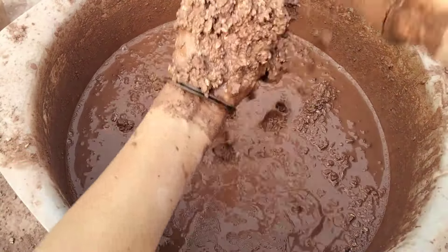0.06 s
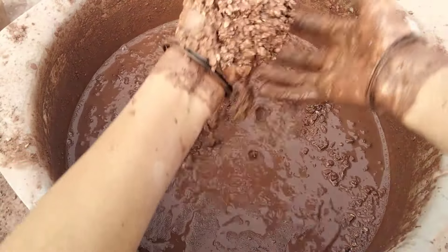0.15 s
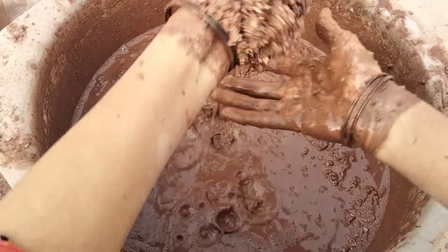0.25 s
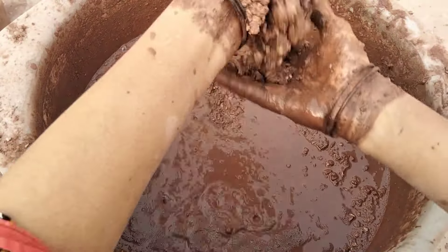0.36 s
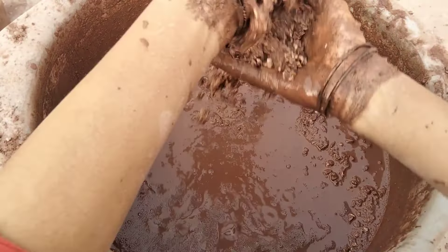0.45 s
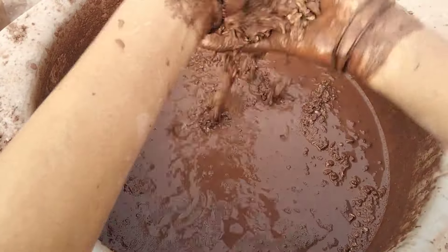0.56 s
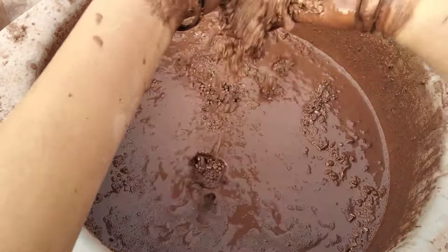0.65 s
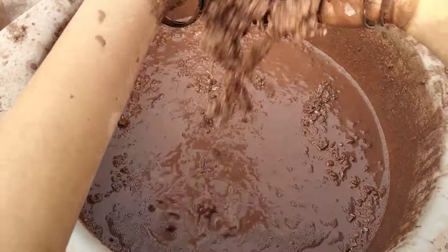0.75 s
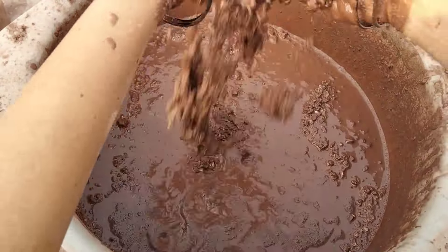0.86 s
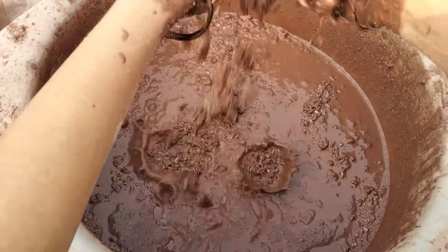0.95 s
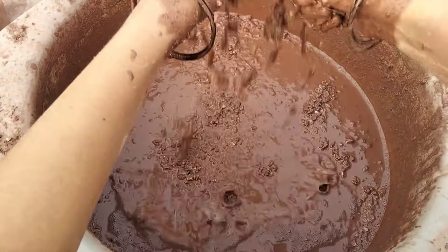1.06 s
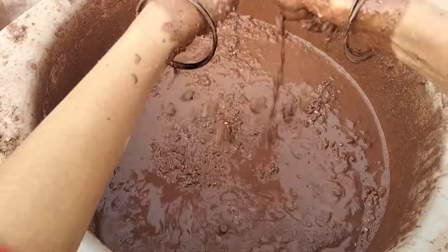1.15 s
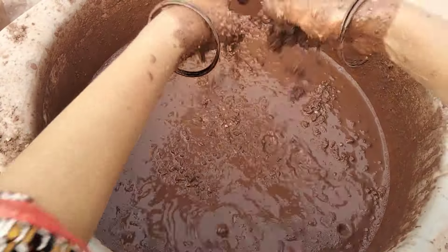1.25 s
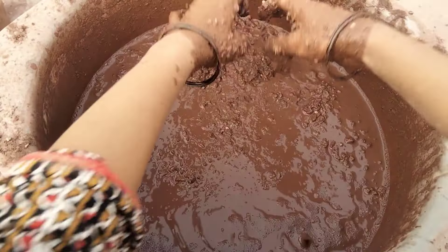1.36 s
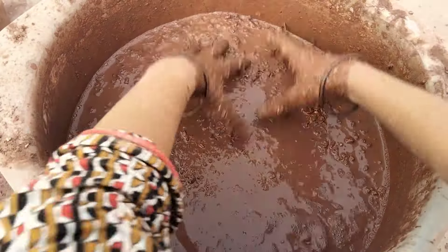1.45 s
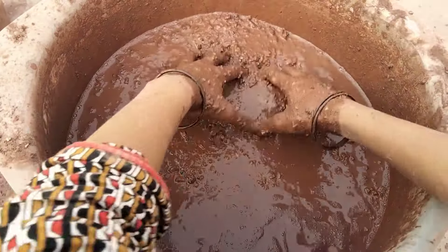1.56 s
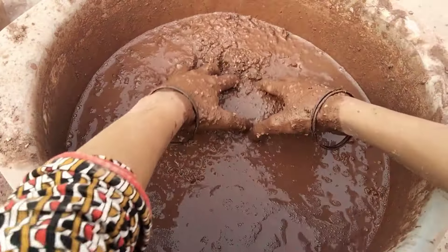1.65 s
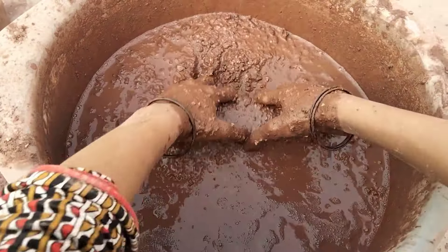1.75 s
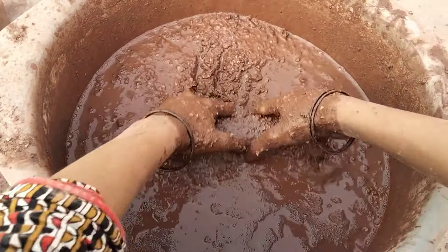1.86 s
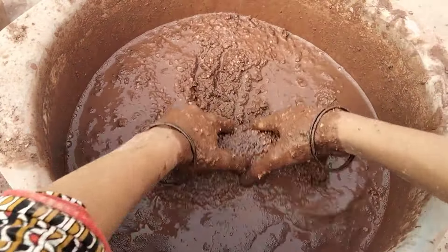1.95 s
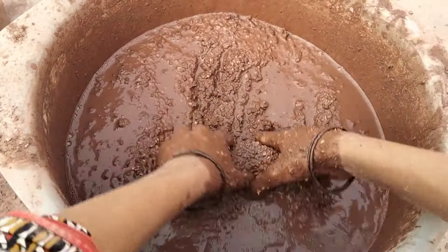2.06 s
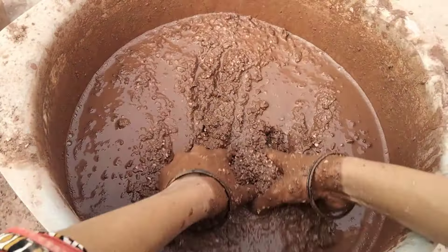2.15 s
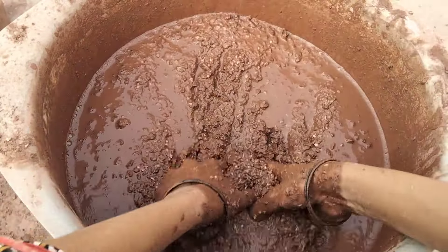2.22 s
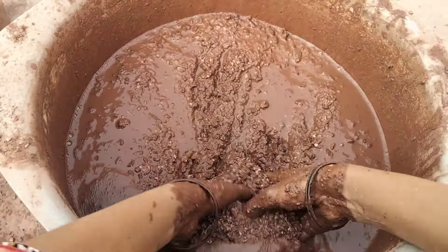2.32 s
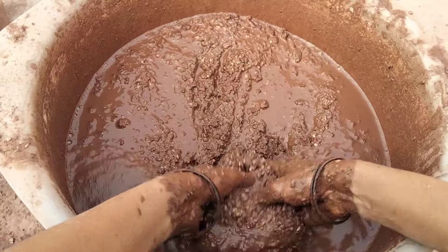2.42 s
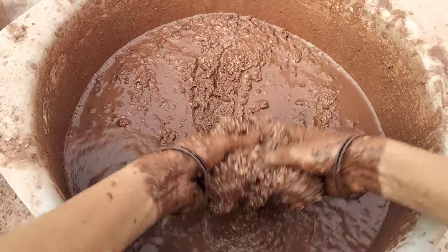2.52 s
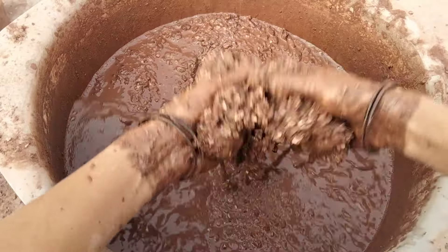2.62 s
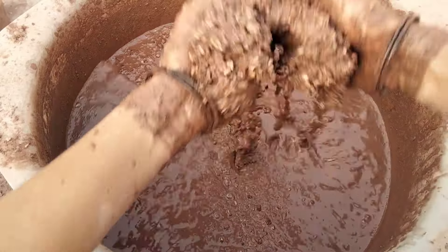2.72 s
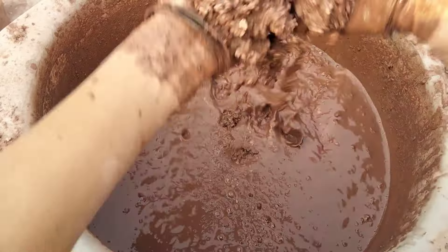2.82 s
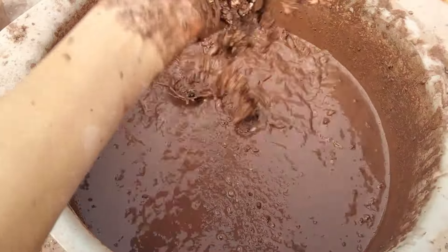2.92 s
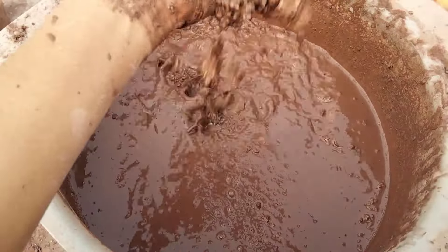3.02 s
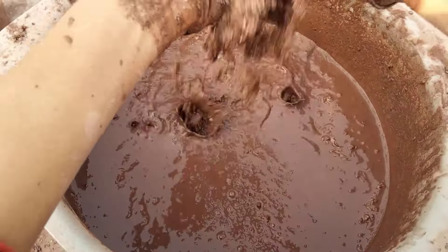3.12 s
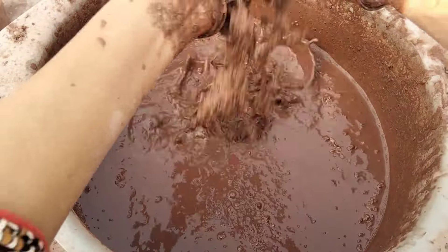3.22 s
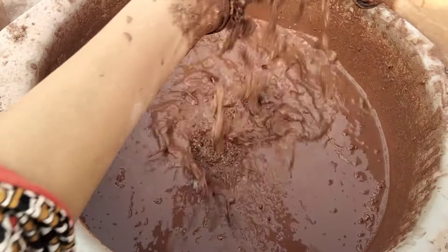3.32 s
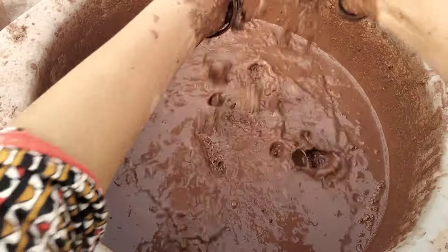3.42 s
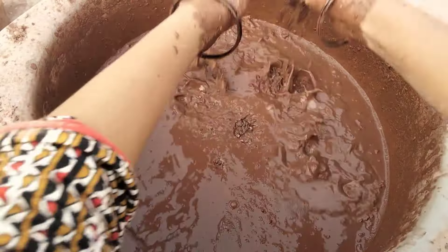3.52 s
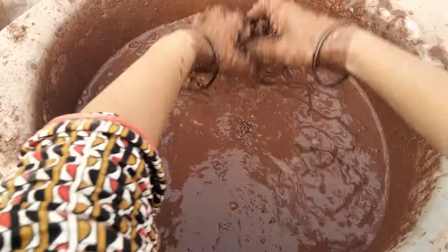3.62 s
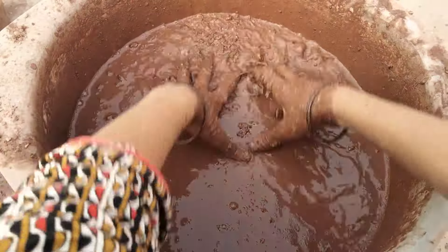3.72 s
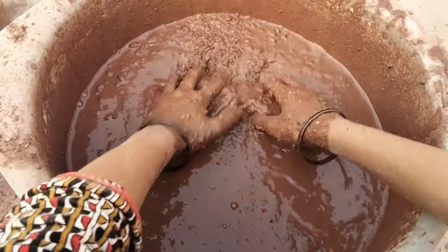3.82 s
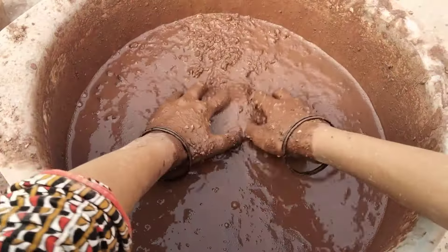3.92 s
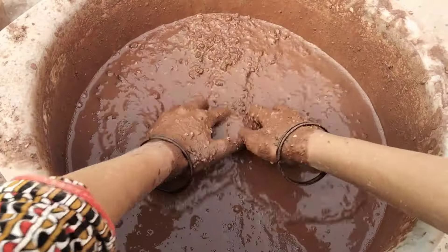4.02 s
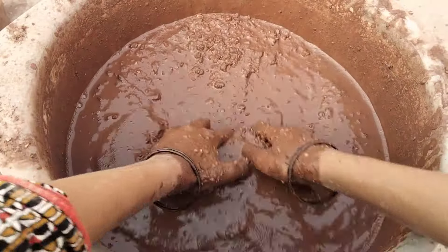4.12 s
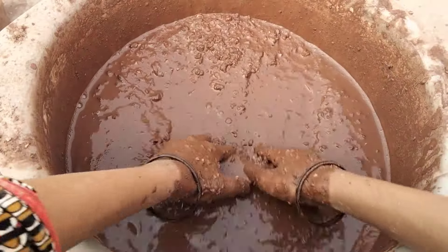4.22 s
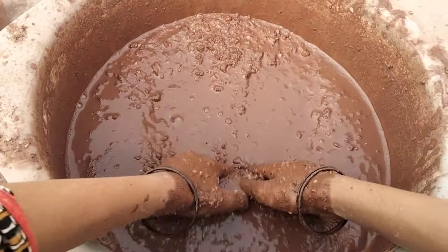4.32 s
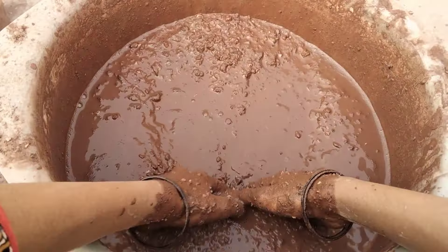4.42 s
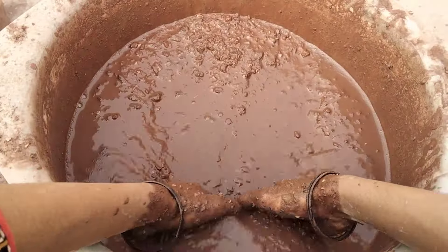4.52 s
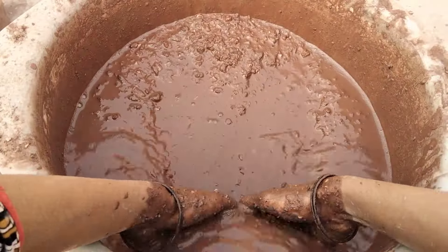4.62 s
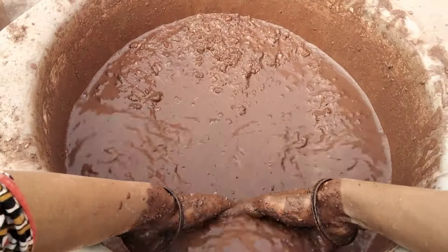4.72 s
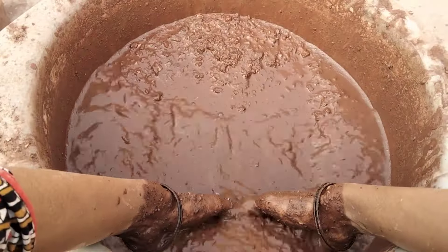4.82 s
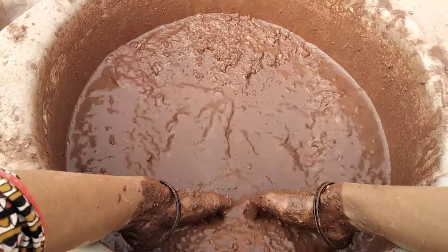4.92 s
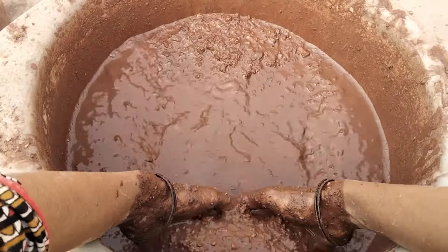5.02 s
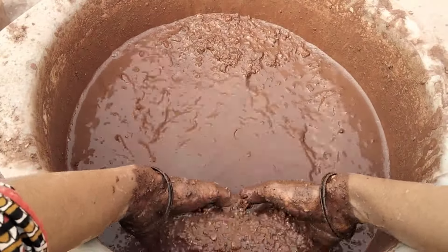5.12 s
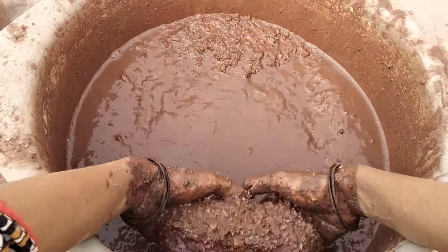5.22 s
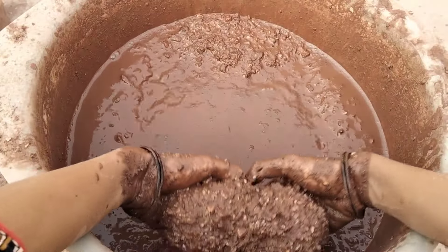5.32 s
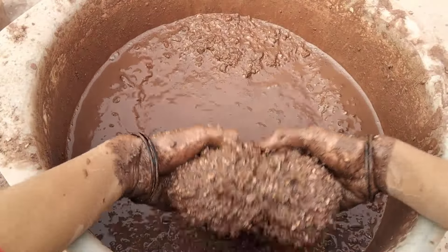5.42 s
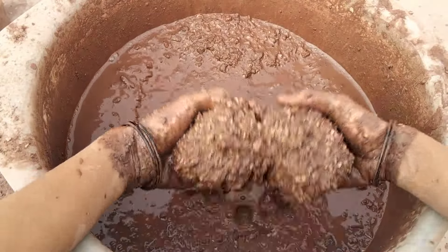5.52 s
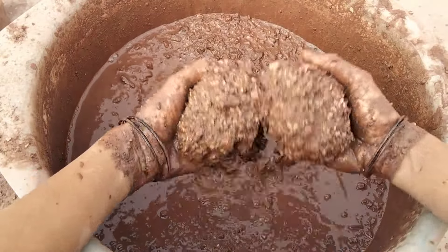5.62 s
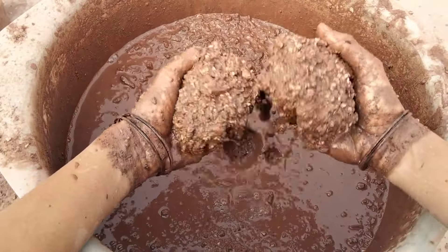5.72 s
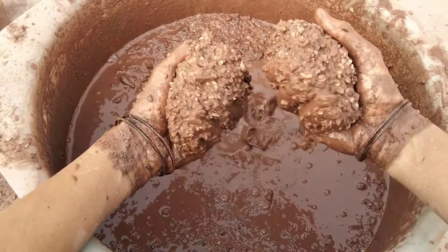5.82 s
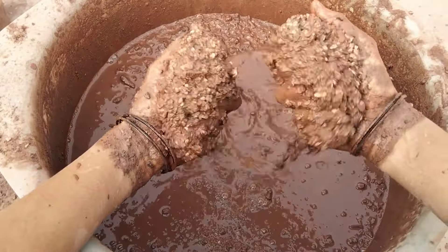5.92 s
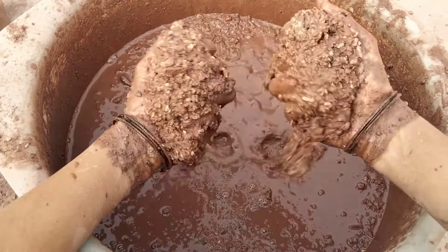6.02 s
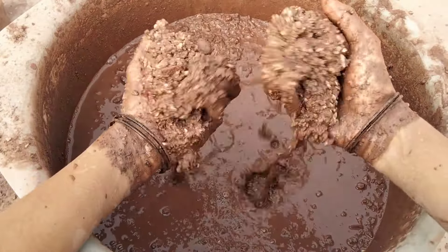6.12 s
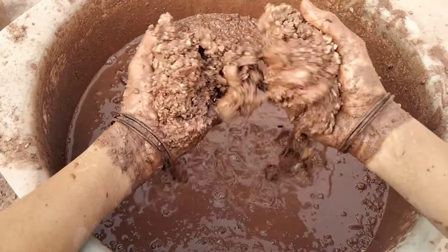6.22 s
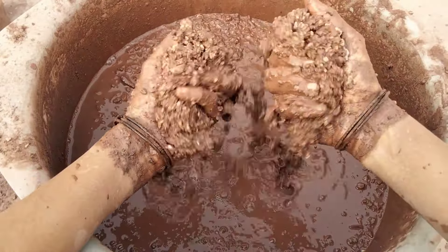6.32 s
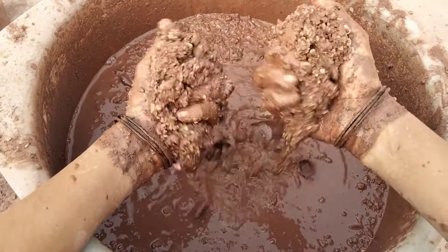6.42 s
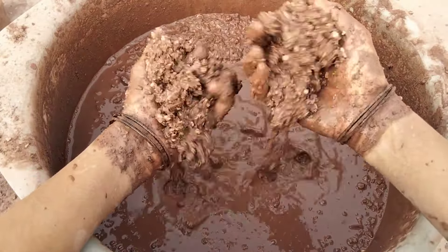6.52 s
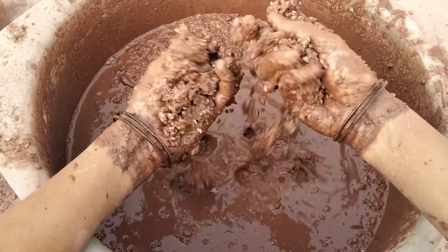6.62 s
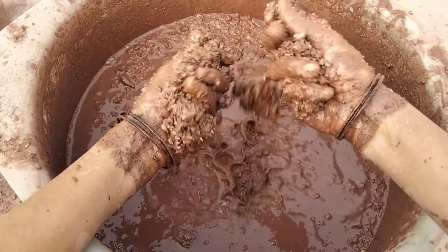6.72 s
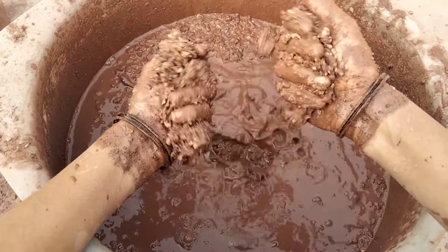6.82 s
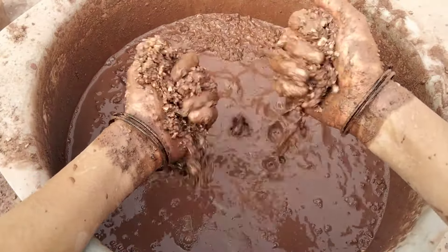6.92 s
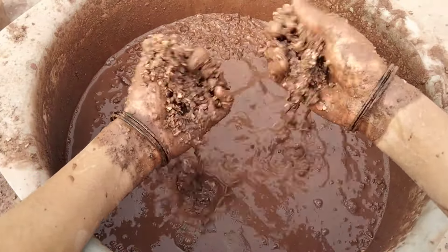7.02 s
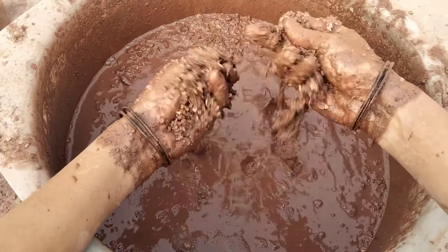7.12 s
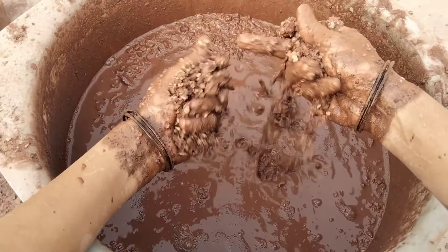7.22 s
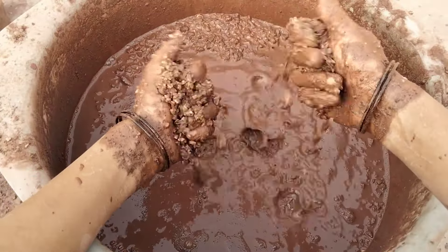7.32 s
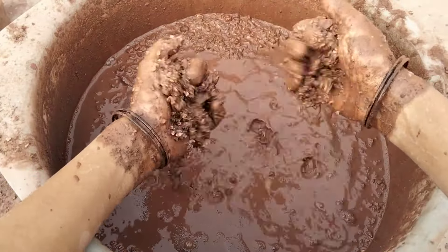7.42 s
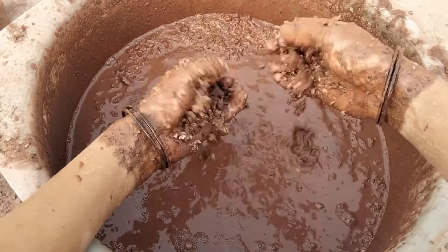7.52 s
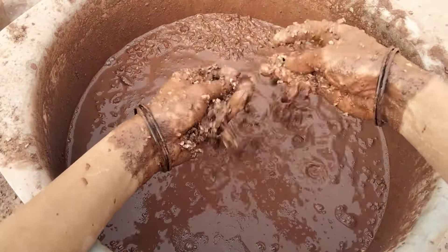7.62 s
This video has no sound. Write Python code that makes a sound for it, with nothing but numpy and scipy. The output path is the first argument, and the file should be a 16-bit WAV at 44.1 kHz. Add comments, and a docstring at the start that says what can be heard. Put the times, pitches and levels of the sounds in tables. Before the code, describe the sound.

Close, bright outdoor sound from a phone microphone just above a wide tub. From 0 to 1.3 seconds, gritty mud falls in dense, crisp splats, fine spray and sharp ticks, with one especially hard crack at 1.2. From 1.3 to 2.5 the hands go under: duller sloshing, short gurgles, grinding grit, bubble pops and a squelch near 2.2. From 2.55 to 3.5 heavier clods splatter thickly, ending in a strong burst. Then it drops to murky slosh and low gurgles; from 4.3 to 5.2 grit hisses along the tub wall, with a watery squeeze near 4.55. From 5.3 drips and small splats return, thickening after 6 into steady crackling patter, with wet squeezes around 6.5 and 7.2 and small pops, continuing to the end at 7.7. Thuds ring briefly in the tub; a faint low rumble stays beneath.

```python
"""Wet splats and sharp ticks, bright and close: hands knead gritty mud in a wide tub just under a phone.
Clods and drips burst into sprays of filtered ticks, and their thuds ring the air in the tub; bubbles pop as
short gliding tones. Fingers patter, grind grit and slosh slurry in shaped noise; drags, gurgles and squelches
are drifting noise bands. A short echo surrounds the tub, and a low outdoor rumble lies under it all."""
import sys
import numpy as np
from scipy import signal
from scipy.fft import rfft, irfft, next_fast_len
from scipy.io import wavfile
from scipy.ndimage import uniform_filter1d

SR = 44100
rng = np.random.default_rng(int(sys.argv[2]) if len(sys.argv) > 2 else 0)


def master_out(mix):
    """Clip the mix to full scale and print it as 16-bit PCM to the path in sys.argv[1]."""
    frames = np.transpose(np.atleast_2d(mix))
    ceiling = np.clip(frames, -1, 1)
    pcm = np.round(ceiling * 32767).astype(np.int16)
    wavfile.write(sys.argv[1], SR, pcm)


def nominal_scale(level):
    """Amplitude ratio for a level in decibels (scalar or array-like)."""
    x = np.asarray(level, float) / 20
    return 10 ** x


N = 337806
T = np.arange(N) / SR  # seconds

# Outdoor rumble, its spectrum. Each row: frequency in Hz, relative level in dB per Hz.
RUMBLE_SPECTRUM = [(12, -45), (20, -27), (53, -16), (80, -2.5), (112, -4), (163, 2), (204, -3), (243, -3.5),
                   (270, -14.5), (328, -4), (468, -16), (640, -23), (700, -19.5), (910, -44), (1540, -120)]
RUMBLE_DB = -36.5  # rms
# Slow swell of the rumble. Each row: time in seconds, relative level in dB.
RUMBLE_SWELL = [(0, 0.5), (1.5, 0.5), (3, -0.5), (4.5, 1), (6, -1), (7.66, -0.5)]

# Air modes between the tub walls. Each row: frequency in Hz, width in Hz, gain in dB.
TUB_MODES = [(640, 46, 3.5), (1142, 57, 1.5), (1580, 31, -1), (2000, 95, -4), (2470, 52, -11.5)]
# Comb of resonances between hands and tub wall. Each row: time in seconds, spacing in Hz.
WALL_COMB = [(0, 318), (1.85, 313), (2.3, 388), (3.5, 314), (4.0, 321), (4.45, 360), (7.66, 367)]
BOUNCE, BOUNCES = 0.42, 4  # gain of each bounce re the one before; paths summed, direct one included

# Grit dragged along the tub wall, one hissing band. Each row: time in seconds, level in dB, centre in Hz.
WALL_DRAG = [(4.32, -34, 4320), (4.34, -22, 4200), (4.384, -27, 4620), (4.56, -22.5, 4460),
             (4.8, -26.5, 4500), (5.042, -26.5, 4635), (5.08, -22, 4520), (5.27, -40, 4620)]
# Slurry gurgling between the fingers, narrow drifting bands.
# Each row: start in seconds, peak in seconds, end in seconds, peak level in dB, first Hz, last Hz.
GURGLES = [(0.0, .15, .45, -45.5, 400, 380), (.58, .65, 0.7, -36.5, 368, 382),
           (1.334, 1.39, 1.58, -32, 642, 681), (1.36, 1.45, 1.6, -35, 883, 958),
           (3.54, 3.62, 3.75, -38.5, 639, 660), (4.003, 4.412, 4.55, -31.5, 650, 738),
           (4.3, 4.694, 4.8, -32, 1070, 1104)]
# Water pressed out of a handful, broad swells. A row ending before its peak stops short of it;
# one ending before its start stays silent.
# Each row: start in seconds, peak in seconds, end in seconds, peak level in dB, first Hz, last Hz.
SQUELCHES = [(2.129, 2.25, 2.2, -26, 2260, 2820), (2.298, 2.395, 2.2, -35, 2904, 2208),
             (4.5, 4.584, 4.7, -29, 3100, 2724), (6.421, 6.484, 6.52, -23.5, 4270, 4460),
             (7.22, 7.265, 7.04, -26.5, 2190, 2900)]
GURGLE_EDGE_DB, SQUELCH_EDGE_DB = -4, -10  # level at start and end re peak

# Work of the hands. Each row: time in seconds, fine spray in dB, grinding grit in dB, sloshing slurry in dB.
HANDS = [(0.0, -18.5, -27, -39.5), (.5, -16.5, -26.5, -36), (1.03, -21, -32, -35.5), (1.3, -15, -25.5, -43),
         (1.33, -27, -27, -29), (1.8, -29.5, -34, -30.5), (2.0, -23.5, -27.5, -27.5),
         (2.19, -27, -24, -26.5), (2.41, -16.5, -20, -32.5), (2.6, -21, -27, -34),
         (3.09, -18.5, -24.5, -41), (3.21, -18, -29.5, -33.5), (3.5, -11.5, -21.5, -40),
         (3.56, -19.5, -25.5, -30.5), (3.74, -32, -36.5, -28.5), (4.33, -31, -30.5, -32),
         (4.6, -22.5, -27.5, -33), (5.02, -28, -30, -32.5), (5.14, -25, -26.5, -36),
         (5.26, -33.5, -33, -40), (5.45, -28.5, -33.5, -50), (5.6, -27.5, -35, -47),
         (5.77, -26, -33, -42.5), (6.35, -18, -28.5, -47), (6.51, -14.5, -29, -34), (6.8, -20, -28, -36.5),
         (7.1, -15.5, -28, -39), (7.26, -19.5, -24.5, -40), (7.38, -19, -31.5, -43),
         (7.66, -17.5, -28.5, -42)]
# Spectrum of the fine spray. Each row: frequency in Hz, relative level in dB per Hz.
SPRAY_SPECTRUM = [(1470, -67), (2500, -25), (4170, -7), (7020, 1), (9750, 2.5), (14900, -3.5),
                  (15600, -4.5)]
# Spectrum of the grinding grit. Each row: frequency in Hz, relative level in dB per Hz.
GRIT_SPECTRUM = [(710, -20), (1200, -1), (1720, 3.5), (2010, 3.5), (2800, 4), (3710, 1.5), (7000, -1.5),
                 (9100, -28), (15400, -120)]
# Spectrum of the sloshing slurry. Each row: frequency in Hz, relative level in dB per Hz.
SLOSH_SPECTRUM = [(260, -9.5), (450, -6), (539, -3.5), (642, 2), (855, -5.5), (966, 1), (1380, -2),
                  (1600, -0.5), (2080, -4.5), (3000, -13), (5000, -45)]
# The patter dies away, then returns at once. Each row: return in seconds, fading in seconds, depth in dB.
LULLS = [(.184, 0.023, 6.5), (.338, 0.078, 3), (1.123, 0.018, 17), (1.162, 0.034, 7), (1.284, 0.051, 17.5),
         (2.746, 0.035, 3.5), (3.0, 0.13, 3.5), (3.447, 0.04, 7.5), (6.277, 0.036, 5.5), (6.735, 0.09, 6.5),
         (6.418, 0.018, 2), (6.513, 0.012, 1), (2.58, 0.015, 6), (7.36, 0.073, 3)]
BLUBS_PER_S = 60  # soft bubbles in the slosh

# Bubbles and plops. Each row: start in seconds, relative level in dB, pitch in Hz, 60 dB decay in seconds.
POPS = [(0.094, -13, 1990, .03), (0.094, -17, 2500, 0.028), (0.095, -10.5, 1590, 0.053),
        (0.094, -25, 1160, 0.025), (.1, -18.5, 3420, 0.13), (0.187, -14, 1600, 0.035),
        (0.607, -16, 1580, 0.033), (1.204, -7.5, 3580, .03), (1.286, -12, 3280, 0.044),
        (1.287, -14, 4060, 0.044), (1.918, -11, 2150, 0.033), (1.989, -8, 1840, 0.13),
        (2.162, -14, 2100, 0.037), (2.303, -16, 1190, 0.061), (2.305, -16, 782, 0.13),
        (2.329, -13.5, 947, 0.07), (2.225, -15, 2880, 0.085), (2.245, -17, 2180, 0.065),
        (2.385, -15, 4940, 0.055), (2.409, -12, 2250, 0.087), (2.46, -14, 1910, .04),
        (2.883, -8, 1580, 0.048), (2.937, -11, 1580, 0.063), (3.041, -2, 1560, 0.041),
        (3.043, -13.5, 640, 0.043), (3.043, -13, 1140, 0.041), (3.095, -14, 1220, .04),
        (3.302, -15, 1190, .04), (3.373, -12, 2500, .03), (3.376, -13, 3000, .03), (3.599, -19, 667, 0.23),
        (4.04, -22.5, 394, 0.084), (5.159, -16, 2567, 0.033), (5.438, -15.5, 2406, 0.088),
        (5.659, -13, 2600, 0.02), (5.466, -22, 1900, .02), (5.544, -25, 330, .03), (5.978, -17, 450, .015),
        (5.978, -16, 850, .012), (5.82, -26, 1150, .04), (5.91, -15, 2800, 0.038), (5.98, -18, 1580, .02),
        (6.047, -8, 2920, 0.024), (6.279, -10, 5520, .04), (6.49, -18, 2270, 0.034),
        (7.075, -16, 2000, 0.043), (7.172, -12, 3100, 0.023), (7.243, -15.5, 2380, 0.072),
        (7.428, -17, 1720, .03)]
BUBBLES_PER_S, BUBBLE_CYCLES = 130, 70  # in a squelch; cycles to fall 60 dB

# Clods landing. Each row: start in seconds, relative level in dB, spray centre in Hz, relative thud in dB.
SPLATS = [(0.0647, -2, 10300, -31), (0.0922, 1, 7200, -18), (0.186, -2.5, 10000, -16),
          (0.2096, -0.5, 9550, -32), (0.34, -1, 9300, -33), (0.3775, -0.5, 9770, -15),
          (0.4287, -2.5, 8400, -11), (0.4824, 6, 11400, -20.5), (0.5093, 2, 10300, -22),
          (0.598, -8, 9160, -9), (0.6878, -1.5, 10100, -19), (0.741, 2, 10100, -38), (0.776, 0, 8550, -40),
          (0.7922, 1.5, 11200, -19.5), (0.831, 1.5, 10500, -29), (0.864, -0.5, 10000, -18),
          (.878, -1, 10500, -28), (0.9037, -3, 10000, -12), (0.9358, 0.5, 9700, -16),
          (0.9653, 0, 5700, -12), (0.9934, -5, 7660, -15), (1.02, -1.5, 10100, -19),
          (1.0642, -0.5, 10700, -29), (1.1296, -4, 9500, -17), (1.1664, 1.5, 7700, -15.5),
          (1.2096, 1, 9400, -24), (1.284, -4, 6120, -28), (1.313, 0.5, 8500, -40), (2.5484, -5, 8100, -21),
          (2.581, -2, 8900, -32), (2.6646, -1.5, 7300, -21), (2.7474, 5, 7600, -19), (2.7918, 1, 9900, -29),
          (2.8406, 5.5, 8200, -22), (2.8799, 3.5, 7000, -31), (2.931, 0.5, 8500, -31),
          (3.0031, 3.5, 10200, -28), (3.037, 6, 6800, -24.5), (3.0744, 2, 9470, -22),
          (3.0909, 4, 8100, -18.5), (3.1141, 4.5, 7130, -22), (3.1547, 4.5, 9700, -24),
          (3.2112, -2, 9450, -14), (3.2386, 3, 9000, -17.5), (3.272, -2, 8650, -26),
          (3.3203, 1, 9500, -15.5), (3.3732, 2, 9500, -37), (3.4472, 1, 9500, -17),
          (3.4815, 6.5, 8000, -17), (3.6473, -9.5, 8800, -1), (5.342, -6, 5950, -20),
          (5.441, -2.5, 10280, -34), (5.545, -6, 6500, -31), (5.5646, -5, 10300, -23),
          (5.629, -1, 5760, -23), (5.6715, -8, 8450, -21), (5.686, -6, 10400, -22), (5.709, -5, 8550, -15),
          (5.7394, -6, 8610, -17), (5.7544, -2.5, 8400, -21), (5.792, -9.5, 10700, -14),
          (5.815, -10, 8680, -15), (5.8587, -4.5, 10500, -22), (5.884, -6, 7800, -25),
          (5.962, -6, 8220, -29), (5.9783, 1.5, 10700, -21.5), (6.015, -7, 10000, -27),
          (6.046, -7, 8950, -38), (6.109, -2.5, 8950, -21), (6.13, -2.5, 10300, -18.5),
          (6.186, -5, 10600, -18), (6.22, 0.5, 9700, -19), (6.24, -6.5, 9060, -17),
          (6.2792, -4.5, 9990, -22), (6.319, -3, 10600, -17.5), (6.43, 0, 9900, -40),
          (6.5147, -2, 9400, -29), (6.5998, -1, 11000, -33), (6.6504, -9.5, 7610, -10),
          (6.6683, 0.5, 10000, -16), (6.854, -1, 9400, -27), (7.071, -1.5, 8650, -16),
          (7.12, -2, 9880, -26), (7.1667, -4, 10500, -12.5), (7.515, 0, 7360, -19.5),
          (7.5495, -1.5, 7200, -26), (7.5944, -5.5, 9150, -26), (7.6173, -4, 10600, -22)]
# Single wet grains that crack sharply.
# Each row: start in seconds, relative level in dB, spray centre in Hz, relative thud in dB.
TICKS = [(0.0283, 0, 10300, -15), (0.0444, 3, 9080, -12.5), (0.1144, -5, 9470, -21),
         (0.2394, -2, 8280, -27), (0.5327, -1, 10300, -22), (0.599, 2, 9200, -10), (0.6084, -1, 9410, -19),
         (0.6729, -8, 9400, -21), (0.6898, -2, 10600, -27), (.713, 0, 10500, -28), (0.7547, 7, 10300, -27),
         (1.0416, 4, 10800, -27), (1.0989, -3, 8040, -15), (1.2034, 16, 10100, -23), (1.2974, 1, 8320, -25),
         (1.333, 6, 10500, -30), (1.362, -5, 8000, -30), (1.435, -7, 10000, -30), (2.581, -7, 8660, -30),
         (2.7294, 2, 7080, -16), (2.7647, 1, 10300, -21), (3.0114, 2, 9110, -19), (3.0544, 2, 7890, -22),
         (3.1324, -1, 8650, -26), (3.184, -3, 9300, -25), (3.1892, 2, 9310, -23), (3.2225, 5, 9500, -25),
         (3.163, 0, 10500, -25), (3.2946, 0, 9330, -24), (3.3892, 5, 9540, -30), (3.4236, 1, 10600, -29),
         (4.135, -16, 5500, -25), (5.2989, -13, 8670, -18), (5.3348, -10, 10300, -17),
         (5.4344, -8, 10100, -30), (5.6123, -7, 7150, -20), (5.656, -2, 8580, -17), (5.7614, -3, 8280, -27),
         (5.878, -5, 8600, -17), (5.9165, -7, 9360, -16), (5.9469, -5, 8260, -25), (5.9808, -2, 10400, -22),
         (6.205, 1, 8600, -20), (6.268, -2, 9080, -12), (6.3207, 6, 10600, -22), (6.3663, -3, 9340, -35),
         (6.403, -6, 10600, -34), (6.431, -4, 9640, -34), (6.4794, 3.5, 7150, -15), (6.5158, 1, 10400, -18),
         (6.5324, -4, 6570, -25), (6.5605, 1, 9620, -28), (6.5764, 3, 7190, -27), (6.6004, 1, 10900, -28),
         (6.6703, 6, 10100, -25), (6.766, -7, 11100, -28), (6.787, -6, 11600, -16), (6.828, -2, 8980, -19),
         (6.8544, 5, 8980, -21), (6.9144, 1, 10200, -25), (6.9306, -7, 9960, -24), (6.9444, -4, 8450, -24),
         (7.0824, 0, 9200, -24), (7.1204, -7, 9890, -29), (7.1531, -4, 11300, -18), (7.1686, 0, 10500, -21),
         (7.2894, -2, 10100, -20), (7.3612, -10, 9660, -27), (7.3886, -7, 10400, -24),
         (7.4275, 2, 10000, -22), (7.465, -6, 8370, -22), (7.5234, 1, 7580, -30), (7.5956, 6, 9010, -25),
         (7.6234, -2, 11500, -20)]
# Small drips falling at random while mud is held up. Each row: from seconds, to seconds, mean level in dB.
DRIPPING = [(0.0, 1.11, -13), (2.55, 3.45, -11), (5.3, 5.97, -22), (6.0, 7.66, -12.5)]
DRIPS_PER_S, CRACKLES_PER_S, CRACKLE_DB = 30, 90, 0  # while dripping; crackle level re drips
DRIP_HZ, DRIP_SCATTER_DB, DRIP_THUD_DB = 10200, 2.8, -25
SPLAT_S, DRIP_S, TICK_S = 0.036, 0.013, 0.0045  # mean time to fall 60 dB; the clod's is for 0 dB
LONGER_PER_DB = 0.17  # bigger clods take longer: natural log of time per dB
SPLAT_SCATTER = 0.3  # spread of the decay times as a share
FOCUS, FOCUS_DB = 0.22, 4  # width of a splat's own band as a share of its centre, and the band's gain
ROUND_TOP = 1.6  # power of time in the decay; above 1 the top is rounded


def level(x, db):
    """Scale to an rms level."""
    return x * nominal_scale(db) / np.sqrt(np.mean(x ** 2))


def curve(rows):
    """Columns of a table joined by straight lines in time."""
    s, *columns = np.vstack(rows).T
    return [np.interp(T, s, c) for c in columns]


def colour(x, points):
    """Shape a sound by (Hz, dB) points; rms 1."""
    hz, db = np.transpose(points)
    size = next_fast_len(len(x))
    bins = np.arange(size // 2 + 1) * SR / size + 1
    gain = nominal_scale(np.interp(np.log(bins), np.log(hz), db))
    return level(irfft(rfft(x, size) * gain, size)[:len(x)], 0)


def ring(x, hz, width_hz):
    """A resonance, gain 1 at its centre."""
    return signal.lfilter(*signal.iirpeak(hz, hz / width_hz, fs=SR), x)


def walk(rate):
    """Random levels, new rate times a second, joined by straight slews; spread near 1."""
    k = int(SR / rate)
    held = np.repeat(rng.standard_normal(N // k + 1), k)
    return np.sqrt(3 / 2) * uniform_filter1d(held, k)[:N]


def grains(uneven_db):
    """Countless tiny ticks, most faint, a few strong; rms 1."""
    return level(rng.standard_normal(N) * nominal_scale(uneven_db * rng.exponential(size=N)), 0)


def add(out, s, sound):
    """Lay a short sound into a track."""
    i = max(int(s * SR), 0)
    out[i:i + len(sound)] += sound[:N - i]


def surge(row, edge_db):
    """A swell to one peak while the pitch glides evenly: rows (s, dB, Hz)."""
    start, peak, end, db, first_hz, last_hz = row
    peak_hz = np.interp(peak, [start, end], [first_hz, last_hz])
    return [(start, db + edge_db, first_hz), (peak, db, peak_hz), (end, db + edge_db, last_hz)]


def band(rows, width_hz, flicker_db):
    """A band of noise whose centre drifts: slow noise on two carriers in quadrature, while its rows last."""
    db, hz = curve(rows)
    s = np.vstack(rows)[:, 0]
    lowpass = signal.butter(1, width_hz / 2, fs=SR, output="sos")
    slow = signal.sosfilt(lowpass, rng.standard_normal((2, N)))
    phase = 2 * np.pi * np.cumsum(hz) / SR
    hiss = level(slow[0] * np.cos(phase) + slow[1] * np.sin(phase), 0)
    moving = uniform_filter1d(1. * ((T > s[0]) & (T < s[-1])), int(0.023 * SR))
    return hiss * moving * nominal_scale(db + flicker_db * walk(70))


def rumble():
    """Low outdoor noise of the surroundings, swelling slightly."""
    swell = nominal_scale(0.7 * walk(3)) * nominal_scale(curve(RUMBLE_SWELL)[0])
    return level(colour(rng.standard_normal(N), RUMBLE_SPECTRUM) * swell, RUMBLE_DB)


def echo(near):
    """A short decaying echo of the tub that changes as the arms move: a new random tail every 0.1 s."""
    t, hop, wet = np.arange(int(0.25 * SR)) / SR, SR // 10, np.zeros(N)
    padded = np.pad(near, (hop, 2 * hop))
    for i in range(0, N, hop):
        tail = rng.standard_normal(len(t)) * 1000. ** (-t / 0.14) * (t > 0.003)
        piece = padded[i + hop:i + 3 * hop] * signal.windows.hann(2 * hop, sym=False)
        add(wet, (i + 0.5) / SR, signal.fftconvolve(piece, tail / np.sqrt(np.sum(tail ** 2))))
    return wet


def tub(x, dry_db):
    """The air between the tub walls rings at a few pitches, added to the direct sound."""
    return nominal_scale(dry_db) * x + sum(nominal_scale(db) * ring(x, hz, width) for hz, width, db in TUB_MODES)


def wall(x):
    """Repeated bounces off the wall, each weaker, at a delay that follows the hands."""
    lag = SR / curve(WALL_COMB)[0]
    samples = np.arange(N)
    return sum(BOUNCE ** k * np.interp(samples - k * lag, samples, x) for k in range(BOUNCES))


def drag():
    """Grit hisses along the tub wall in one drifting band."""
    return band(WALL_DRAG, 800, 1)


def gurgles():
    """Slurry gurgles between the fingers in narrow gliding bands."""
    return sum(band(surge(row, GURGLE_EDGE_DB), 110, 1.5) for row in GURGLES)


def squelches():
    """Water pressed out of a handful hisses in broad, strongly flickering swells."""
    return sum(band(surge(row, SQUELCH_EDGE_DB), 0.2 * row[4], 4.5) for row in SQUELCHES)


def lull_db():
    """How far the patter has dropped at each moment; each return takes 2 ms."""
    drop = np.zeros(N)
    for s, fading, db in LULLS:
        sinking = np.clip(1.6 * (1 + (T - s) / fading), 0, 1)
        drop += db * sinking * np.clip((s - T) / 0.002, 0, 1)
    return drop


def blubs(low_hz=550, octaves=2.3, cycles=30, glide=0.2, scatter_db=12):
    """Soft bubbles rising through the stirred slurry, each gliding up; rms 1."""
    out = np.zeros(N)
    for when, pitch, size in rng.random((round(BLUBS_PER_S * N / SR), 3)):
        hz = low_hz * 2 ** (octaves * pitch)
        turns = np.arange(int(cycles / hz * SR)) * hz / SR
        shape = np.minimum(turns / 3, 1) * 1000. ** (-turns / cycles)
        tone = np.sin(2 * np.pi * turns * (1 + glide * turns / cycles))
        add(out, when * N / SR, nominal_scale(-scatter_db * size) * shape * tone)
    return level(out, 0)


def slosh(slosh_db, jolt):
    """Slurry noise bounces between hands and wall, with soft bubbles in it."""
    wash = level(wall(colour(grains(2.5), SLOSH_SPECTRUM)), 0) + nominal_scale(-12) * blubs()
    return wash * nominal_scale(slosh_db + 0.49 * jolt + 1.36 * walk(40))


def grit(grit_db, jolt):
    """Grains grind along the bottom and ring the air in the tub."""
    grind = level(tub(colour(grains(2.02), GRIT_SPECTRUM), 1.8), 0)
    return grind * nominal_scale(grit_db + 0.5 * jolt + 2.0 * walk(60))


def fine_spray(spray_db, jolt, wet_db=-26, dull_db=-5):
    """Tiny droplets: faint, smooth and dull with the hands under the surface, else bright and clustered."""
    above = np.clip((spray_db - wet_db) / 8, 0, 1)
    # coarse and fine droplets come and go on their own
    ticks = colour(grains(1.94), SPRAY_SPECTRUM)
    coarse = signal.sosfilt(signal.butter(2, 9000, fs=SR, output="sos"), ticks)
    fine = ticks - coarse
    bright = coarse * nominal_scale(0.8 * above * walk(90)) + fine * nominal_scale(2.2 * above * walk(110))
    dull = colour(bright, [(4000, -3.0), (9000, 1.0), (15500, dull_db)])
    patter = above * bright + (1 - above) * dull
    return patter * nominal_scale(spray_db + 0.9 * jolt + (1 + 1.2 * above) * walk(200))


def hands():
    """Spray patters, grit grinds, slurry sloshes; all share the jolts of the fingers and the lulls."""
    spray_db, grit_db, slosh_db = curve(HANDS)
    jolt = walk(85)
    work = fine_spray(spray_db, jolt) + grit(grit_db, jolt) + slosh(slosh_db, jolt)
    return work * nominal_scale(-lull_db())


def bubbles(above_db=7, scatter_db=4, spread=0.272, lasting_s=0.2):
    """Rows like POPS: air squeezed out of each squelch, following its swell and its pitch."""
    rows = []
    for row in SQUELCHES:
        s, db, hz = np.transpose(surge(row, SQUELCH_EDGE_DB))
        when, size, pitch = rng.random((round(BUBBLES_PER_S * lasting_s), 3)).T
        when = s[0] + when * lasting_s
        pitch = np.interp(when, s, hz) * np.exp(spread * 2 * (2 * pitch - 1))
        loud_db = np.interp(when, s, db) + above_db + scatter_db * 2 * (2 * size - 1)
        some = zip(when, loud_db, pitch, BUBBLE_CYCLES / pitch)
        rows += [r for r in some if r[0] < s[-1]]  # none after the squelch ends
    return rows


def pops(glide=0.017, rise_s=0.00081, rough_db=0.0, wobble=0.039, splash_db=-6):
    """A trapped bubble rings briefly and unsteadily, rising in pitch, with a wet splash around it."""
    out, shake, wet = np.zeros(N), walk(300), grains(0.88)
    for s, db, hz, t60 in POPS + bubbles():
        i, t = int(s * SR), np.arange(int(min(t60, 0.15) * SR)) / SR
        pitch = hz * (1 + glide * t / t60 + wobble * shake[i:i + len(t)])
        tone = np.sin(2 * np.pi * np.cumsum(pitch) / SR)
        splash = level(ring(wet[i:i + len(t)], hz, 0.13 * hz), splash_db)
        shape = np.minimum(t / rise_s, 1) * 1000. ** (-t / t60)
        add(out, s, nominal_scale(db - 2.5) * shape * (tone + splash))
    return out * nominal_scale(rough_db * walk(250))


def drips(per_s, above_db):
    """Rows like SPLATS, scattered over the times of dripping and fainter in the lulls."""
    rows, lull = [], lull_db()
    for start, end, db in DRIPPING:
        when, size, pitch, body = rng.standard_normal((round(per_s * (end - start)), 4)).T
        slots = np.arange(len(when)) + 0.5 + np.tanh(when) / 2
        s = start + (end - start) * slots / len(when)
        loud_db = db + above_db + DRIP_SCATTER_DB * size - np.interp(s, T, lull)
        hz = DRIP_HZ * np.exp(0.5 * np.tanh(pitch) - 0.05)
        rows += zip(s, loud_db, hz, DRIP_THUD_DB + 5 * body)
    return rows


def splats(spray_db=-7.0, thud_db=7, thud_fall=3.3, rise=0.07):
    """Each clod, drip or grain bursts into a spray of droplets round its own pitch; its thud rings the tub."""
    spray, thud = np.zeros(N), np.zeros(N)
    droplets = colour(grains(2.0), SPRAY_SPECTRUM) * nominal_scale(3 * walk(500))
    slap = colour(grains(2.8), [(300, -12), (600, -7.5), (2500, 1.5), (5000, -3.5)])
    landings = [(*row, SPLAT_S * np.exp(LONGER_PER_DB * row[1])) for row in SPLATS]
    landings += [(*row, DRIP_S) for row in drips(DRIPS_PER_S, 0)]
    landings += [(*row, TICK_S) for row in TICKS + drips(CRACKLES_PER_S, CRACKLE_DB)]
    chances = rng.random((len(landings), 2))
    for (s, db, hz, low_db, last_s), (place, spread) in zip(landings, chances):
        t = np.arange(int(min(4 * last_s, 0.1) * SR)) / SR
        i = int(place * (N - len(t)))  # a random stretch of the droplets
        swell = np.minimum(t / (rise * last_s), 1)
        # the clod spreads for a few ms before the spray dies, so the top is rounded
        fall_s = last_s * (1 + SPLAT_SCATTER * (2 * spread - 1))
        fade = 1000. ** -(t / fall_s) ** ROUND_TOP
        burst = droplets[i:i + len(t)]
        burst = swell * fade * (burst + nominal_scale(FOCUS_DB) * ring(burst, hz, FOCUS * hz))
        add(spray, s, level(burst, db + spray_db) * np.sqrt(np.mean((swell * fade) ** 2)))
        thud_shape = swell * fade ** (1 / thud_fall)  # the thud dies more slowly
        add(thud, s, nominal_scale(db + low_db + thud_db) * thud_shape * slap[i:i + len(t)])
    return spray + tub(thud, -14.0)


def scene():
    """Everything in the tub, close, with its short echo, over the outdoor rumble."""
    near = drag() + gurgles() + squelches() + hands() + pops() + splats()
    return (rumble() + nominal_scale(-14.5) * echo(near) + near)[None]


def band_limit(x):
    """A steep low-pass at the top of the band."""
    return signal.sosfilt(signal.butter(12, 15700, fs=SR, output="sos"), x)


def record(dry):
    """The loudest peaks are clipped at 0.86 of full scale; the top is cut above 15.6 kHz."""
    clipped = np.clip(dry, -0.86, 0.86)
    top_cut = signal.ellip(10, 0.1, 60, 15600, fs=SR, output="sos")
    mix = signal.sosfilt(top_cut, clipped)
    return band_limit(mix)


dry = scene()
out = record(dry)
master_out(out)
```